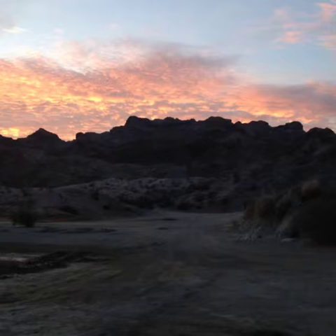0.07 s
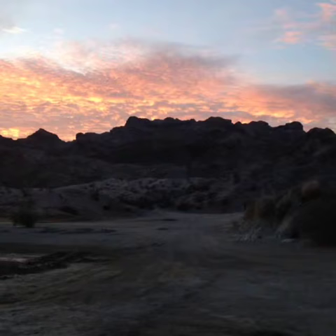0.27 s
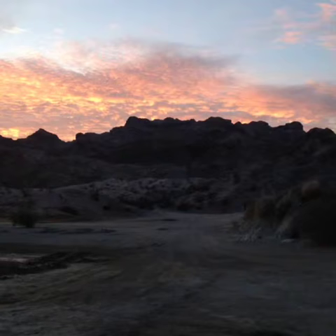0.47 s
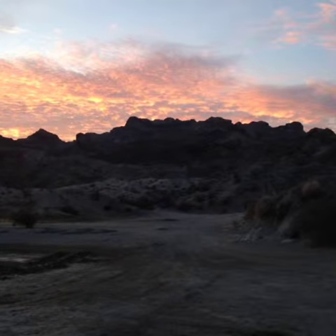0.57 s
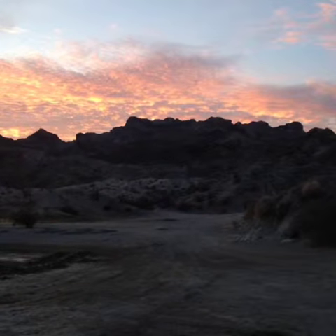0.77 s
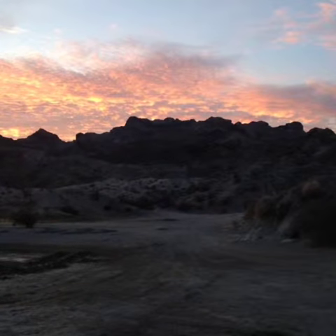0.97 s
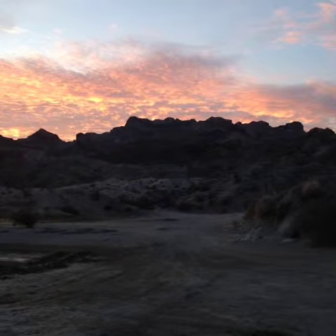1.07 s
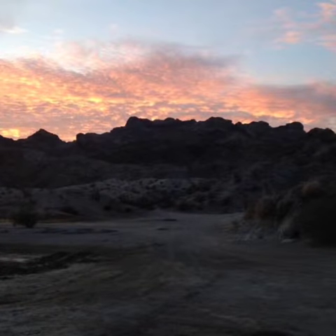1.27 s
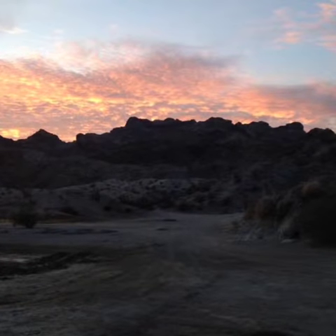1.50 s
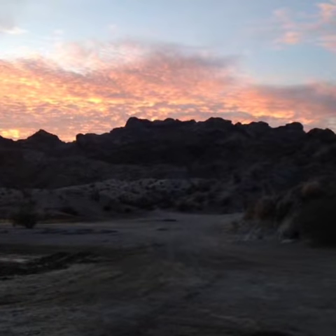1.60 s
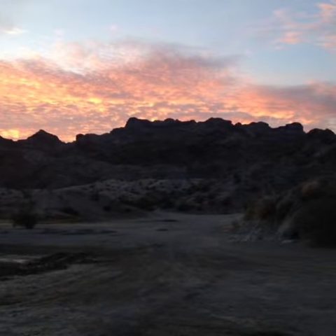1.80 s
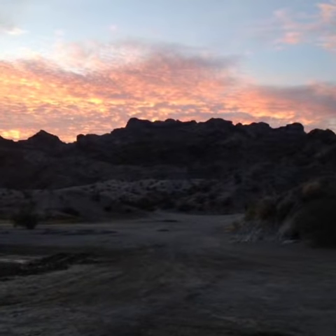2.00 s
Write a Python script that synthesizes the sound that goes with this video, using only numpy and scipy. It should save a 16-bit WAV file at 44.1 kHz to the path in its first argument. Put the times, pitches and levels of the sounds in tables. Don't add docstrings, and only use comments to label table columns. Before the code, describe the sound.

A coyote barks once, then yips up into a high wavering howl across open desert

```python
import sys
import numpy as np
from scipy import signal
from scipy.fft import rfft, irfft
from scipy.io import wavfile

SR = 44100
rng = np.random.default_rng(int(sys.argv[2]) if len(sys.argv) > 2 else 0)


def put_to_file(sound):
    columns = np.atleast_2d(sound).T
    safe = np.clip(columns, -1, 1)
    whole_steps = np.round(safe * 32767)
    wavfile.write(sys.argv[1], SR, whole_steps.astype(np.int16))


def level_to_linear(level):
    exponent = np.asarray(level, float) / 20
    return 10 ** exponent


N = 90404

# (frequency [Hz], spectral level [dB])
AIR_SPECTRUM = [(25, -14), (60, 7.5), (150, 5), (500, -12.5), (1000, -20.5), (3000, -22), (8000, -27.5),
                (15000, -30)]
AIR_DB = -62

# (time [s], level [dB])
WIND_GUSTS = [(0.1, -62.5), (0.158, -65.5), (0.36, -46), (0.452, -43.5), (0.506, -53.5), (0.896, -61),
              (1.038, -51), (1.054, -58.5), (1.14, -48.5), (1.282, -57), (1.31, -58), (1.824, -57),
              (2.014, -48.5), (2.05, -59)]
# (frequency [Hz], width [Hz], level [dB], share of the gusts' swing [ratio])
HOLLOW_MODES = [(124.6, 44, -1, 0.38), (180.6, 18.7, -7.5, .6), (240.7, 20, -4, 0.82),
                (277.1, 25.9, -1, 0.93), (395.3, 62.5, -10, .4)]

# (time [s], peak level [dB], ring frequency [Hz], crack level [dB])
GRIT_TICKS = [
    (0.147, -55, 2450, 9.5),
    (0.179, -51, 2500, -1.5),
    (1.774, -60, 1480, -12),
    (1.809, -50, 1980, -4),
    (1.887, -47, 1840, -18),
]
# (time [s], level [dB])
RUSTLE_LEVEL = [(1.6, -100), (1.66, -74), (1.78, -71), (1.9, -91), (2.0, -100)]
TICK_T60_S, TICK_RISE_S, TICK_CUT_HZ = 0.01, 0.0005, 9000

# (time from its start [s], frequency [Hz], level [dB])
CHIRP_GLIDE = [(0, 4998, -17), (.006, 5490, -4.5), (.016, 5444, 2.5), (.028, 4910, -2.5), (.04, 4340, -8.5),
               (.056, 3933, -16), (.066, 3850, -28)]
# (time [s], level [dB], echo level [dB], pitch factor [ratio])
CHIRP_EVENTS = [
    (.794, -55, -6, 1.0),
    (1.642, -58, -17, 1.0155),
]
CHIRP_ECHO_S, CHIRP_ECHO_CUT_HZ = 0.0232, 5100
CHIRP_NEAR_S, CHIRP_NEAR_DB, CHIRP_OCTAVE_DB = 0.009, -21, -27
CHIRP_TAIL_DB, CHIRP_TAIL_T60_S = -8.5, 0.11

# (delay [s], level [dB])
ROCK_ECHOES = [
    (.0092, -10),
    (.0163, -6),
    (.0186, -10.5),
]
# (delay [s], level [dB])
SLOPE_ECHOES = [
    (.09, -27.5),
    (.16, -23),
    (.26, -28.5),
    (.36, -32),
]
ROCK_CUT_HZ, ROCK_SPREAD_S = 2010, 0.001455
CLIFF_S, CLIFF_DB, CLIFF_CUT_HZ = 0.0385, -1, 2850
SLOPE_CUT_HZ, SLOPE_BLUR_S, DISTANCE_CUT_HZ = 1350, 0.15, 3450
TAIL_DB, TAIL_T60_S, TAIL_START_S = -33, 2.04, 0.011

# (time [s], level [dB])
HUFF_LEVEL = [(1.555, -76), (1.585, -53), (1.608, -45), (1.625, -46.5), (1.642, -61.5), (1.66, -91)]
# (frequency [Hz], width [Hz], level [dB])
BREATH_RESONANCES = [(700, 240, 0), (1200, 200, -9), (1780, 260, -4), (2340, 130, -20)]
HUFF_PULSE_HZ, HUFF_PULSE_DEPTH = 260, 0.43

# (time [s], centre pitch [Hz], level [dB], waver depth [Hz], octave level [dB])
HOWL_GLIDE = [(.394, 1215, -72, 6.2, -24), (.404, 1279, -45, 4.8, -12), (.435, 1417, -45, 25.6, -10),
              (.52, 1490, -47.5, 80.8, -14.5), (.75, 1496, -48.5, 85.6, -16), (.95, 1505, -50, 62, -15),
              (1.155, 1523, -50.5, 49.7, -16), (1.177, 1270, -66, 5, -17), (1.216, 790, -64.5, 5, -40)]
WAVER_HZ, WAVER_TOP_S, WAVER_SKEW_RAD, WAVER_DB = 7.4, 0.76, 0.4, 3.5

# (time [s], main pitch [Hz], level [dB], half-pitch lines [dB], upper lines as the mouth opens [dB])
BARK_GLIDE = [(.084, 530, -68, -1, -6.5), (.092, 581, -46.5, -7.5, -11), (.105, 686, -34.5, -7.5, -4.5),
              (.12, 749, -26.5, 2.5, -7), (.135, 836, -28, 3, 3), (.15, 873.4, -36.5, 3.5, 7),
              (.165, 850, -37.5, -0.5, 0.5), (.178, 686, -49, 0.5, -8), (.192, 550, -67.5, 1, 1)]
YIP_GLIDE = [(.272, 571.3, -77.5, -17, 6.5), (.287, 665, -46, -17, -1.5), (.3, 754, -31, -11.5, -11),
             (.312, 818, -31.5, 0, -5.5), (.318, 923, -43, 3.5, 3.5), (.335, 977, -49.5, 5, 3),
             (.352, 1025, -46, -1, 2.5), (.374, 1059, -40.5, -13.5, -0.5), (.4, 1048, -49.5, -20, -22)]
# (frequency [Hz], level [dB])
BARK_THROAT = [(350, -40), (800, 8.5), (1300, -2), (1700, 2.5), (2100, -6.5), (2450, -6.5), (2800, -16),
               (3300, -24.5)]
YIP_VOCAL_TRACT = [(400, -22.5), (800, 4.5), (1350, -1), (1650, -9.5), (2050, -4), (2450, -12),
                   (2780, -3.5), (3300, -34.5)]
BARK_LINES = [-10, -0.5, -5.5, -14, -6.5, -12, -17, -13.5, -28.5]
YIP_LINES = [-4, 1.5, 0, -3, -4.5, -0.5, -3, -9, -16]
JITTER, SHIMMER_DB, BREATH_DB = 0.0036, 2, -28

START_S, FADE_S = 0.0835, 0.004


def rms_one(x):
    return x / np.sqrt(np.mean(x ** 2) + 1e-20)


def in_time(rows, shift=0):
    times, *columns = np.transpose(rows)
    t = np.arange(N) / SR - shift
    running = (t > times[0]) & (t < times[-1])
    return [np.interp(t, times, column) for column in columns] + [running]


def at_hz(points, hz):
    table_hz, level_db = np.transpose(points)
    return np.interp(np.log(hz), np.log(table_hz), level_db)


def drift(rate_hz):
    r = np.exp(-2 * np.pi * rate_hz / SR)
    wander = signal.lfilter([1], [1, -2 * r, r * r], rng.standard_normal(N + SR))
    return rms_one(wander[SR:])


def resonate(x, peaks):
    out = 0
    for k, (hz, width, db) in enumerate(peaks):
        r = np.exp(-np.pi * width * 1.55 / SR)
        b = (1 - r * r) / 2 * np.array([1, 0, -1])
        a = [1, -2 * r * np.cos(2 * np.pi * hz / SR), r * r]
        ringing = signal.lfilter(b, a, signal.lfilter(b, a, x))
        out = out + (-1) ** k * level_to_linear(db) * ringing
    return out


def delayed(x, s):
    return np.interp(np.arange(N) - s * SR, np.arange(N), x, left=0)


def thin(x, cut_hz, order):
    return signal.sosfilt(signal.butter(order, cut_hz, "high", fs=SR, output="sos"), x)


def scatter(x, db, t60, start, share):
    t = np.arange(SR) / SR
    returns = rng.standard_normal(SR) * (rng.random(SR) < share)
    tail = returns * level_to_linear(-60 * t / t60) * (t > start)
    return signal.fftconvolve(x, tail * level_to_linear(db) / np.sqrt(np.sum(tail ** 2)))[:N]


def air():
    hz = np.maximum(np.arange(N // 2 + 1) * SR / N, 1)
    spectrum = rfft(rng.standard_normal(N)) * level_to_linear(at_hz(AIR_SPECTRUM, hz))
    return level_to_linear(AIR_DB) * rms_one(irfft(spectrum, N))


def wind():
    gust_db, _ = in_time(WIND_GUSTS)
    mean_db = gust_db.mean()
    hum = 0
    for hz, width, mode_db, share in HOLLOW_MODES:
        level_db = mean_db + share * (gust_db - mean_db) + mode_db + 1.62 * drift(9.9)
        mode = rms_one(resonate(rng.standard_normal(N), [(hz, width, 0)]))
        hum = hum + level_to_linear(level_db) * mode
    return hum


def grit():
    out, t = 0, np.arange(N) / SR
    low_pass = signal.butter(1, TICK_CUT_HZ, fs=SR, output="sos")
    crack = signal.sosfilt(low_pass, thin(rng.standard_normal(N), 1500, order=2))
    for s, db, hz, crack_db in GRIT_TICKS:
        u = np.maximum(t - s, 0)
        ring = np.sin(2 * np.pi * hz * u) + 0.49 * np.sin(2 * np.pi * 1.67 * hz * u)
        envelope = u / (u + TICK_RISE_S) * level_to_linear(db - 60 * u / TICK_T60_S)
        out = out + envelope * (ring + level_to_linear(crack_db) * crack)
    rustle_db, on = in_time(RUSTLE_LEVEL)
    return out + on * level_to_linear(rustle_db + 4.5 * drift(80)) * crack


def bird():
    out = 0
    for s, level_db, echo_db, pitch in CHIRP_EVENTS:
        hz, db, on = in_time(CHIRP_GLIDE, s)
        phase = 2 * np.pi * np.cumsum(pitch * hz) / SR
        whistle = np.sin(phase) + level_to_linear(CHIRP_OCTAVE_DB) * np.sin(2 * phase)
        chirp = on * np.sqrt(2) * level_to_linear(db + level_db) * whistle
        rock_echo = delayed(thin(chirp, CHIRP_ECHO_CUT_HZ, order=6), CHIRP_ECHO_S)
        near_echo = delayed(chirp, CHIRP_NEAR_S)
        out = out + chirp + level_to_linear(echo_db) * rock_echo + level_to_linear(CHIRP_NEAR_DB) * near_echo
    return out + scatter(out, CHIRP_TAIL_DB, CHIRP_TAIL_T60_S, 0.004, 0.05)


def desert(x):
    direct = signal.sosfilt(signal.cheby2(16, 45, DISTANCE_CUT_HZ, fs=SR, output="sos"), x)
    off_rock = thin(direct, ROCK_CUT_HZ, order=1)
    faces = off_rock + 0.36 * delayed(off_rock, ROCK_SPREAD_S)
    rocks = sum(level_to_linear(db) * delayed(faces, s) for s, db in ROCK_ECHOES)
    cliff = level_to_linear(CLIFF_DB) * delayed(thin(direct, CLIFF_CUT_HZ, order=3), CLIFF_S)
    off_slope = thin(direct, SLOPE_CUT_HZ, order=3)
    slopes = sum(delayed(scatter(off_slope, db, SLOPE_BLUR_S, 0, 0.01), s) for s, db in SLOPE_ECHOES)
    tail = scatter(off_slope, TAIL_DB, TAIL_T60_S, TAIL_START_S, 0.02)
    return direct + rocks + cliff + slopes + tail


def huff():
    db, on = in_time(HUFF_LEVEL)
    pulse_hz = HUFF_PULSE_HZ * (1 + 0.15 * drift(48.5))
    gate = 1 + HUFF_PULSE_DEPTH * np.sin(2 * np.pi * np.cumsum(pulse_hz) / SR)
    breath = rms_one(resonate(gate ** 2 * rng.standard_normal(N), BREATH_RESONANCES))
    return on * level_to_linear(db + 3.75 * drift(60)) * breath


def howl():
    hz, db, depth_hz, octave_db, on = in_time(HOWL_GLIDE)
    turn = 2 * np.pi * WAVER_HZ * (np.arange(N) / SR - WAVER_TOP_S)
    waver = np.cos(turn - WAVER_SKEW_RAD * np.cos(turn) + WAVER_SKEW_RAD)
    pitch_hz = (hz + depth_hz * waver) * (1 + JITTER * drift(51))
    phase = 2 * np.pi * np.cumsum(pitch_hz) / SR
    main = level_to_linear(SHIMMER_DB * drift(27)) * np.sin(phase)
    octave = level_to_linear(octave_db + SHIMMER_DB * drift(43)) * np.sin(2 * phase)
    return on * np.sqrt(2) * level_to_linear(db + WAVER_DB * waver) * (main + octave)


def yelp(rows, throat, folds_db):
    main_hz, db, half_db, open_db, on = in_time(rows)
    hz = main_hz / 2 * (1 + JITTER * drift(68))
    phase = 2 * np.pi * np.cumsum(hz) / SR
    main_db = at_hz(throat, 2 * hz)
    lines = 0
    for k, fold_db in enumerate(folds_db, 1):
        line_db = at_hz(throat, k * hz) - main_db + fold_db + SHIMMER_DB * drift(33)
        line_db = line_db + (k % 2) * half_db + (k > 2) * open_db
        lines = lines + level_to_linear(line_db) * np.sin(k * phase + k * k)
    breath = level_to_linear(BREATH_DB) * rms_one(resonate(rng.standard_normal(N), BREATH_RESONANCES))
    return on * level_to_linear(db) * (np.sqrt(2) * lines + breath)


def scene():
    bark = yelp(BARK_GLIDE, BARK_THROAT, BARK_LINES)
    yip = yelp(YIP_GLIDE, YIP_VOCAL_TRACT, YIP_LINES)
    voice = bark + yip + howl() + huff()
    return (desert(voice) + bird() + grit() + wind() + air())[None]


def roll_off(x):
    return signal.sosfilt(signal.butter(12, 15640, fs=SR, output="sos"), x)


def record(dry):
    opening = np.clip((np.arange(N) / SR - START_S) / FADE_S, 0, 1)
    return roll_off(dry * opening)


dry = scene()
out = record(dry)
put_to_file(out)
```